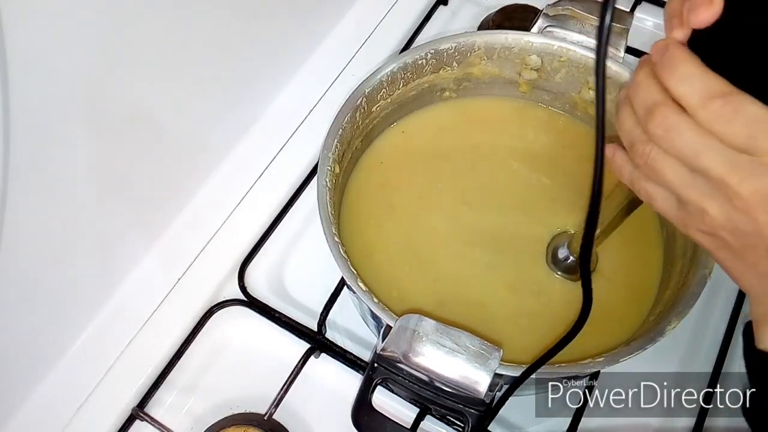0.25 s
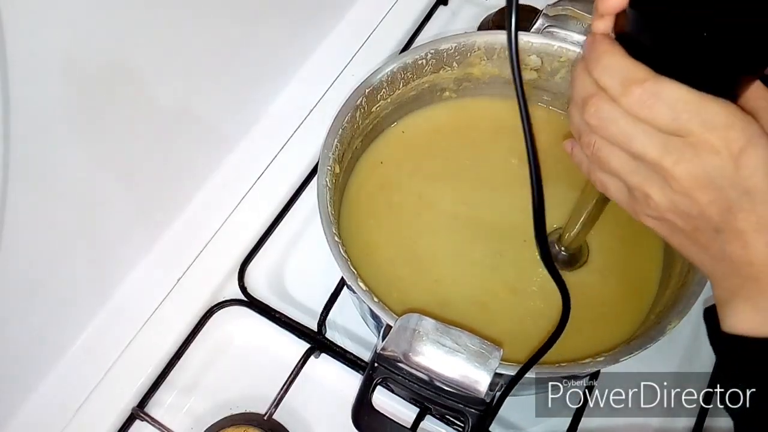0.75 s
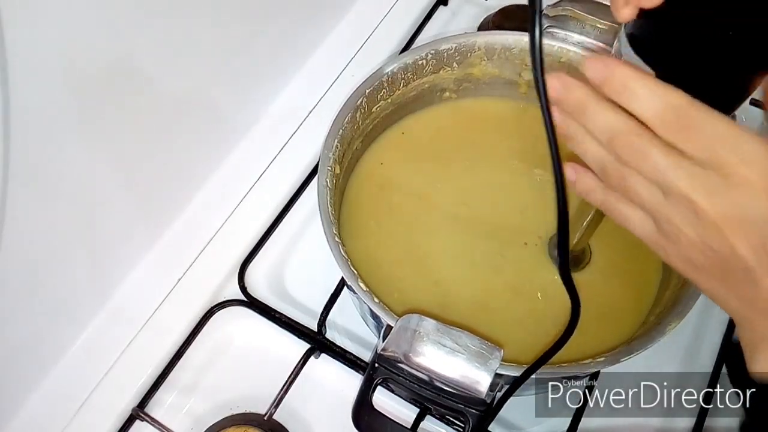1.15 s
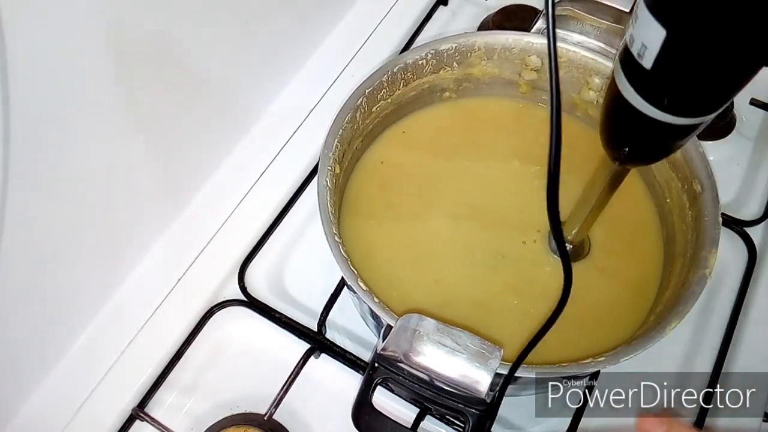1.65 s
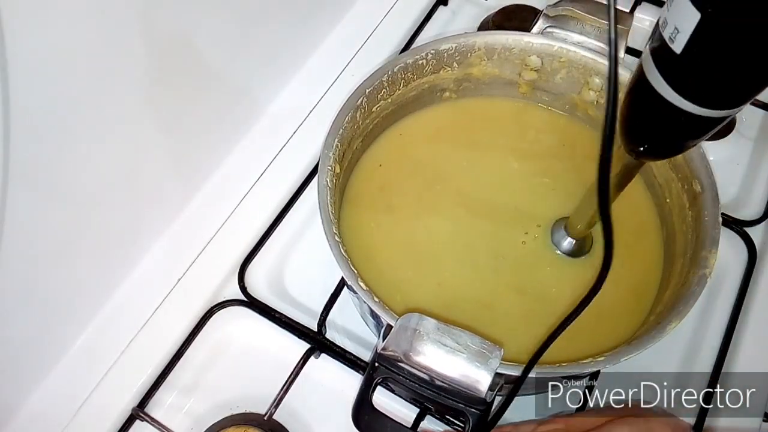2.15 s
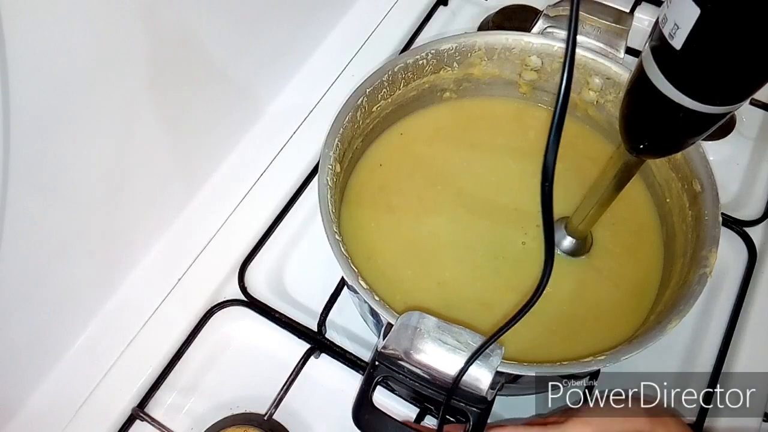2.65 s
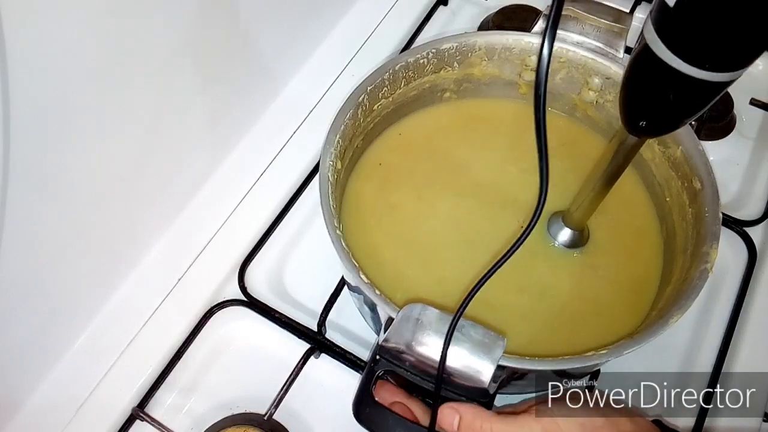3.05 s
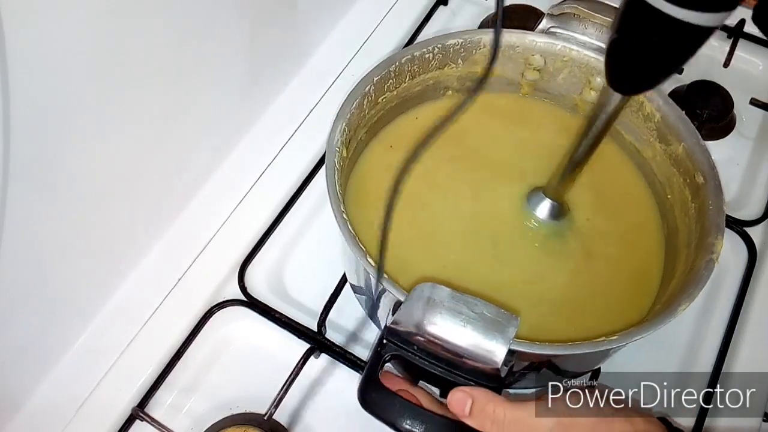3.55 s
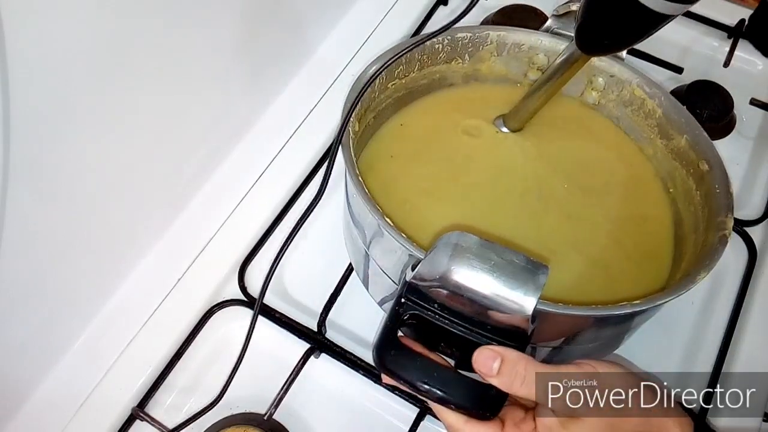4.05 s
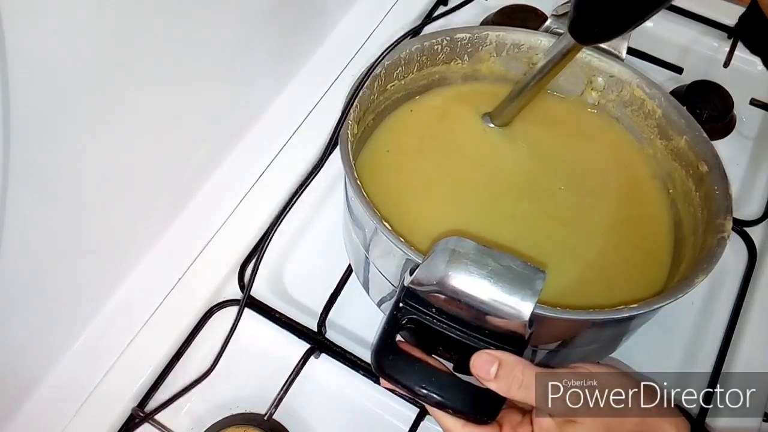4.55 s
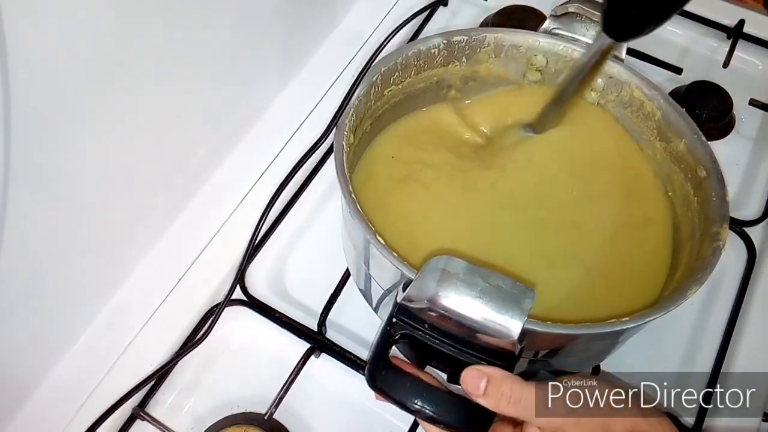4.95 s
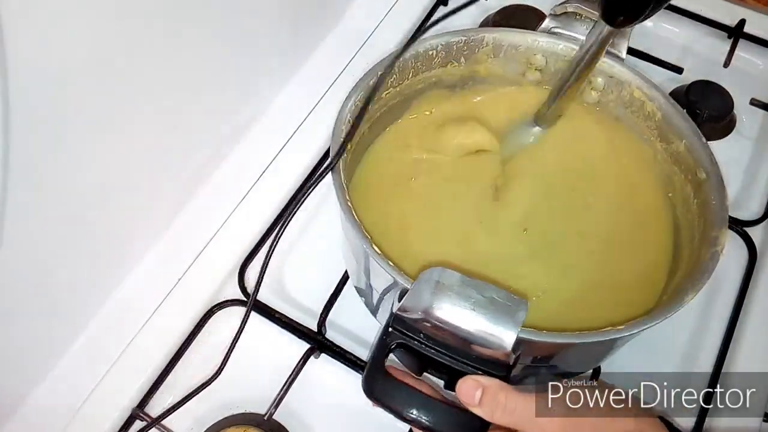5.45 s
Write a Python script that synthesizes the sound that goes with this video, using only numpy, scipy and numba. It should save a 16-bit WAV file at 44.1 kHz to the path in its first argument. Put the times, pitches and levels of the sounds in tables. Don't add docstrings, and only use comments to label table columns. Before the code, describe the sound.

A hand blender whines up and coasts down in thick soup, quiet ticks and fridge hum follow, then a deeper burst ends in hard metallic knocks.

```python
import sys
import numpy as np
from scipy import signal
from scipy.fft import rfft, irfft
from scipy.io import wavfile
from scipy.ndimage import uniform_filter1d
from numba import njit

SR = 44100
rng = np.random.default_rng(int(sys.argv[2]) if len(sys.argv) > 2 else 0)


def field_ratio(decibels):
    return 10 ** (np.asarray(decibels, dtype=float) / 20)


def store_wav(level_fs):
    pcm = np.round(np.clip(np.atleast_2d(level_fs), -1, 1) * 32767)
    wavfile.write(sys.argv[1], SR, pcm.T.astype(np.int16))


N = 251325
T = np.arange(N) / SR

# frequency in Hz, level in dB per Hz.
BRUSH_COLOUR = [(1900, -30), (2500, -2), (3400, 0), (4500, -2), (5500, -2), (6300, -9), (7300, -18),
                (8300, -27), (10000, -60)]
# frequency in Hz, width in Hz, level in dB over the churn.
POT_WALLS = [(480.2, 25, -3.5), (780, 60, -6), (592.3, 45, -11.5)]


def level(x, db=0):
    return x * field_ratio(db) / np.sqrt(np.mean(x ** 2))


def noise(points):
    hz, db = np.transpose(points)
    log_hz = np.log(np.arange(1, N // 2 + 2) * SR / N)
    gain_db = np.interp(log_hz, np.log(hz), db, -99, -99)
    return level(irfft(rfft(rng.standard_normal(N)) * field_ratio(gain_db), N))


@njit
def svf(x, hz, width):
    y, b, l = np.empty(len(x)), 0., 0.
    for i in range(len(x)):
        g, k = np.tan(np.pi * hz[i] / SR), width / hz[i]
        v = (b + g * (x[i] - l)) / (1 + g * (g + k))
        b, l, y[i] = 2 * v - b, l + 2 * g * v, k * v
    return y


def band(hz, width):
    hz = hz + np.zeros(N)
    once = svf(rng.standard_normal(N), hz, 1. * width)
    return level(svf(once, hz, 2. * width))


def walk(rate):
    k = int(SR / rate)
    held = np.repeat(rng.standard_normal(N // k + 1), k)
    return 1.3 * uniform_filter1d(uniform_filter1d(held, k), k)[:N]


def kitchen():
    # frequency in Hz, level in dB at full strain, dB per dB of strain.
    hum_tones = [(103.5, -70.5, 0.3), (201, -70, 0.7), (304, -74.5, 0.4), (400, -72.5, 0.8),
                 (780, -78.5, 0.7), (500, -82, 1.2)]
    # time in seconds, level in dB.
    hum_swell = [(1.4, -13), (1.73, -26.5), (2.11, -8), (2.5, -9), (2.62, 1), (2.93, 5), (3.2, 2),
                 (3.42, 5), (3.57, -10), (3.95, -8)]
    # frequency in Hz, width in Hz, level in dB.
    compressor = [(2750, 130, -77), (4500, 500, -76)]
    # frequency in Hz, level in dB per Hz.
    air_colour = [(20, -10), (60, -9), (100, 2), (150, 3), (500, 3), (1000, 1), (2000, -4), (2700, -1),
                  (3600, -4.5), (4800, -2.5), (6300, -7), (8000, -14.5), (10000, -15.5), (15600, -17)]
    strain = np.interp(T, *np.transpose(hum_swell))
    hum = 0
    for hz, db, share in hum_tones:
        gain = field_ratio(db + share * strain + 3 * walk(11))
        hum = hum + gain * np.sin(2 * np.pi * hz * T + .8 * walk(7))
    rings = sum(field_ratio(db + 0.81 * walk(12)) * band(hz, width) for hz, width, db in compressor)
    air = noise(air_colour) * field_ratio(-66 + 1.5 * walk(2.4))
    return air + hum + rings


def swells(rows, grain_db):
    out = 0
    for start, length, hz, width, db in rows:
        swell = np.sin(np.pi * np.clip((T - start) / length, 0, 1) ** .7) ** 2
        out = out + swell * field_ratio(db + grain_db * walk(80)) * band(hz, width)
    return out


def rubs():
    # start in seconds, length in seconds, frequency in Hz, width in Hz, level in dB.
    rub_swells = [(2.82, .12, 4600, 900, -66), (3.02, .14, 3600, 2500, -63), (3.39, .14, 3900, 900, -60),
                  (3.37, .16, 2500, 4000, -64), (3.24, .3, 700, 900, -63), (2.9, .3, 600, 800, -69),
                  (3.99, .07, 4600, 2000, -59), (1.2, 1.1, 1800, 4000, -67), (2.53, .06, 2400, 1500, -64),
                  (3.7, .35, 1500, 3000, -68)]
    return swells(rub_swells, grain_db=4.0)


def grip():
    # start in seconds, length in seconds, frequency in Hz, width in Hz, level in dB.
    grip_swells = [(.25, .9, 4270, 500, -28.5), (.6, .75, 3100, 600, -30), (.05, .4, 4900, 600, -35),
                   (.12, .45, 13600, 400, -58), (.22, .45, 10000, 700, -50), (.5, .4, 13050, 600, -51),
                   (.75, .45, 5800, 700, -37), (4.55, 1.0, 5390, 550, -33), (1.05, .22, 5200, 700, -51),
                   (1.03, .18, 1300, 300, -42), (4.12, .4, 3300, 700, -36), (4.1, .4, 1400, 500, -33),
                   (4.08, .65, 100, 40, -55)]
    return swells(grip_swells, grain_db=4.4)


def contacts(rows, rough):
    out = np.zeros(N + SR)
    ms = np.arange(SR // 4) * 1000 / SR
    for start, db, hz, rise_ms, t60_ms in rows:
        rise = np.sin(np.pi / 2 * np.minimum(ms / rise_ms, 1)) ** 2
        shape = rise * field_ratio(-60 * np.maximum(ms - rise_ms, 0) / t60_ms)
        centre = hz + 0 * ms
        scatter = svf(svf(rng.standard_normal(len(ms)), centre, 0.3 * hz), centre, .3 * hz)
        ring = (1 - rough) * np.sin(2 * np.pi * hz * ms / 1000) + rough * level(scatter)
        i = int(start * SR)
        out[i:i + len(ms)] += field_ratio(db) * shape * ring
    return out[:N]


def strikes(touches, modes, rise_ms):
    tilt_hz = 2500
    return [(start, db + mode_db + tilt * np.log2(hz / tilt_hz), ratio * hz, rise_ms, t60_ms)
            for start, db, ratio, tilt in touches for hz, mode_db, t60_ms in modes]


def pot_bumps():
    # time in seconds, peak in dB, frequency in Hz.
    bumps = [(2.228, -52.5, 306), (2.228, -61, 490), (2.449, -53, 420), (2.542, -53, 370),
             (2.557, -56, 356), (2.566, -53, 327), (3.25, -46, 310), (3.253, -53, 537), (3.298, -51, 430),
             (3.344, -49.5, 420), (3.385, -39, 402), (3.408, -42.5, 415), (3.455, -51, 410),
             (4.001, -44.5, 246)]
    return contacts([(start, db, hz, 4, 97) for start, db, hz in bumps], rough=.45)


def ticks():
    # frequency in Hz, level in dB, t60 in ms.
    rim, grate, cord = [(755, -5, 44), (1390, -1, 22), (2330, -2, 38), (3310, -0.5, 12), (4490, 1, 14),
                        (5980, -8.5, 12)], [(5380, -2, 30), (4340, -6.5, 30), (6550, -12.5, 18), (3000, -19, 28),
                                     (5000, -20, 230), (2060, -19.5, 64)], [(4870, -8, 7.5), (5600, -17.5, 6.2), (3160, -26, 11),
                                                    (5600, -28, 110), (4830, -29, 100)]
    switch, bell = [(201, -4.5, 140), (540, -1.5, 75), (2540, -8, 71), (5050, -9.5, 38)], [(1131, -8, 110), (1540, 0, 47), (2410, -4.5, 40), (4090, -6, 35),
                                    (5480, -3, 21.3), (7840, -6.5, 27), (10500, -10.5, 25), (13700, -5, 40)]
    # time in seconds, peak in dB, pitch ratio, brightness in dB per octave.
    rim_taps = [
        (2.45, -44, 1.06, 1.5),
        (3.173, -57, 0.79, 0),
        (4.001, -56, 0.79, -9),
    ]
    grate_clicks = [
        (2.4792, -47.5, 1.03, 2.5),
        (3.7235, -53.5, 1.1, -1),
        (3.7325, -45, 1.3, -3),
        (3.7372, -31.5, 0.94, 3),
    ]
    cord_snaps = [
        (2.9553, -19, 1.01, .1),
    ]
    switch_snaps = [
        (4.061, -23, 1.01, .1),
    ]
    bell_knocks = [
        (.005, -22, 1.1, 0),
        (.043, -18.5, .84, -1),
        (4.08, -32.5, 1.01, 1.5),
        (5.077, -21, 0.75, 1),
        (5.094, -14, 1.3, 2),
        (5.1022, -3.5, 1.01, 0),
        (5.107, -11, 1.01, 3),
        (5.1332, -11.5, 1.06, 0.5),
    ]
    rows = strikes(rim_taps, rim, rise_ms=0.47) + strikes(grate_clicks, grate, rise_ms=1.3)
    rows += strikes(cord_snaps, cord, rise_ms=1.4) + strikes(switch_snaps, switch, rise_ms=1.9)
    rows += strikes(bell_knocks, bell, rise_ms=.5)
    return contacts(rows, rough=.5)


def blender(run, low, orders, whistles, shell, splash, churn, pot, wobble, beat, lumpy_db):
    # frequency in Hz, width in Hz, gain in dB.
    body = [(1047, 69, 5), (520.5, 34, 19.5), (399.7, 64, 23), (576, 60, 16), (455, 55, 8.5)]
    # frequency in Hz, level in dB per Hz.
    top_colour = [(7000, -4.5), (8200, 3.5), (9800, 0), (11000, -2), (12800, -2), (14200, -6), (15600, -9)]
    start_s, *columns = np.transpose(run)
    hz, brush_db, song_db, swirl_db = (np.interp(T, start_s, c) for c in columns)
    since_start = np.maximum(T - start_s[0], 0)
    octaves = np.log2(hz / 258)
    splash_db = 1.14 + 0.26 * swirl_db
    top_db = -19.5 + 10.5 * octaves

    coasting = uniform_filter1d(np.clip(-np.gradient(hz) * SR / 400, 0, 1), size=2000)
    uneven_hz = hz * (1 + (wobble + .0008 * coasting) * walk(60))
    turn = 2 * np.pi * np.cumsum(uneven_hz) / SR

    unbalance_db = brush_db + 10 * octaves - 30 * np.exp(-since_start / 0.016)
    multiple_db = brush_db + .4 * (song_db - brush_db) - 16 * np.exp(-since_start / .15)
    partials = [(k, db + (multiple_db if k > 1 else unbalance_db)) for k, db in low]
    partials += [(k, db + song_db) for k, db in orders]
    tones = 0
    for k, db in partials:
        lift_db = sum(gain / (1 + (2 * (k * hz - f) / width) ** 2) for f, width, gain in body)
        wave = np.sqrt(2) * np.sin(k * turn + 2 * np.pi * rng.random())
        tones = tones + field_ratio(db + lift_db + lumpy_db * walk(18)) * wave

    pulse = 1 + beat * np.cos(2 * turn) + beat * np.cos(turn) / 2
    walls = sum(field_ratio(db + 0.83 * walk(9)) * band(f, width) for f, width, db in pot)
    swirl = level(noise(churn) * field_ratio(1.2 * walk(30)) + walls)
    spray = noise(splash) * pulse * field_ratio(0.44 * walk(45))
    whistling = sum(field_ratio(db - 15 * coasting + 3 * walk(4)) * band(k * hz, width) for k, width, db in whistles)
    top = level(noise(top_colour) + whistling)
    housing = sum(field_ratio(db + 2.0 * walk(4.5)) * band(f, width) for f, width, db in shell)
    hiss = level(noise(BRUSH_COLOUR) + housing)
    hiss = pulse * field_ratio(0.22 * walk(67)) * (hiss + field_ratio(top_db) * top)
    on = (T >= start_s[0]) & (T < start_s[-1])
    return on * (field_ratio(brush_db) * (hiss + field_ratio(splash_db) * spray + field_ratio(swirl_db) * swirl) + tones)


def deep_run():
    # time in seconds, shaft in Hz, brush noise in dB, blade song in dB, swirl in dB over the brushes.
    run = [
        (4.079, 159.4, -53.5, -70, 8),
        (4.122, 175.5, -30.5, -69, -4),
        (4.253, 208.6, -27.5, -65, -8),
        (4.341, 213.3, -27, -52.5, -2.5),
        (4.42, 210.6, -27.5, -41, 3.5),
        (4.725, 206.1, -27.5, -35.5, 6),
        (4.989, 204.9, -28, -35, 5.5),
        (5.06, 197.7, -27.5, -36, 5.5),
        (5.19, 199.6, -25.5, -40, 1),
    ]
    # multiple of shaft speed, level in dB (low: over the brushes; upper: over the song).
    low, orders = [(1, -12.5), (2, -26.5), (3, -22)], [(4, -12)]
    # multiple of shaft speed, width in Hz, level in dB over the top hiss.
    whistles = [(42.3, 700, -10), (52, 700, -9), (58, 700, -11), (65.5, 700, -12)]
    # frequency in Hz, width in Hz, level in dB over the brushes.
    shell = [(3040, 260, -13), (3770, 150, -20.5)]
    # frequency in Hz, level in dB per Hz.
    splash, churn = [(590, -33.5), (1000, -7.5), (1040, -1), (1500, -2), (1610, -4), (2400, -9.5),
                     (2500, -15.5), (3250, -31), (5500, -120)], [(15, -51.5), (25, -26.5), (59, -36.5), (134, -25.5), (212, -12),
                                          (342, -11.5), (480, -3.5), (560, -5.5), (774, -4.5), (990, -9),
                                          (1290, -48.5), (2180, -120)]
    return blender(run, low, orders, whistles, shell, splash, churn, POT_WALLS,
                   wobble=.012, beat=.1, lumpy_db=4.0)


def free_run():
    # time in seconds, shaft in Hz, brush noise in dB, blade song in dB, swirl in dB over the brushes.
    run = [
        (0.0, 158, -38.5, -55, -16.5),
        (0.07, 193.4, -28, -50.5, -11.5),
        (0.28, 241.2, -24.5, -36.5, -9.5),
        (0.5, 256.2, -25.5, -30.5, -12.5),
        (0.808, 259.9, -25.5, -30, -9.5),
        (0.9, 197.8, -26.5, -35, -5),
        (0.95, 175.2, -29, -43.5, -1.5),
        (1.065, 166.8, -31.5, -65, -4),
        (1.32, 120.6, -80, -97, 3),
    ]
    # multiple of shaft speed, level in dB (low: over the brushes; upper: over the song).
    low, orders = [(1, -14), (2, -20), (3, -15)], [(4, -2.5), (5, .5), (6, 2), (7, -3), (8, -9.5), (9, -4.5), (10, -13.5),
                                     (11, -13), (12, -7), (13, -9.5)]
    # multiple of shaft speed, width in Hz, level in dB over the top hiss.
    whistles = [(40, 900, -9), (47.3, 800, -12)]
    # frequency in Hz, width in Hz, level in dB over the brushes.
    shell = [(4800, 610, -9), (3630, 750, -12)]
    # frequency in Hz, level in dB per Hz.
    splash, churn = [(590, -36.5), (1000, -5.5), (1100, -5.5), (1310, 1), (1980, -5.5), (2500, -7),
                     (3250, -36), (5500, -120)], [(20, -22), (60, -29), (130, -17), (190, -9), (310, -12), (480, 0),
                                          (580, -1), (720, -5), (950, -3), (1200, -30)]
    return blender(run, low, orders, whistles, shell, splash, churn, POT_WALLS[2:],
                   wobble=.001, beat=0.14, lumpy_db=2.17)


def room(x):
    t = np.arange(SR // 2) / SR
    tail = rng.standard_normal(len(t)) * field_ratio(-60 * t / 0.49) * (t > .004)
    return x + field_ratio(-11) * signal.fftconvolve(x, tail / np.sqrt(np.sum(tail ** 2)))[:N]


def dull(x):
    low = signal.sosfilt(signal.butter(6, 6600, fs=SR, output="sos"), x)
    return low + field_ratio(-26) * (x - low)


def scene():
    touches = dull(ticks() + pot_bumps())
    near = free_run() + deep_run() + grip() + touches
    return (room(near) + dull(rubs()) + kitchen())[None]


def roll_off(x):
    return signal.sosfilt(signal.butter(12, 15680, fs=SR, output="sos"), x)


def record(dry):
    soft = np.tanh(.7 * dry) / .7
    return roll_off(soft * (T < 5.1838))


dry = scene()
out = record(dry)
store_wav(out)
```